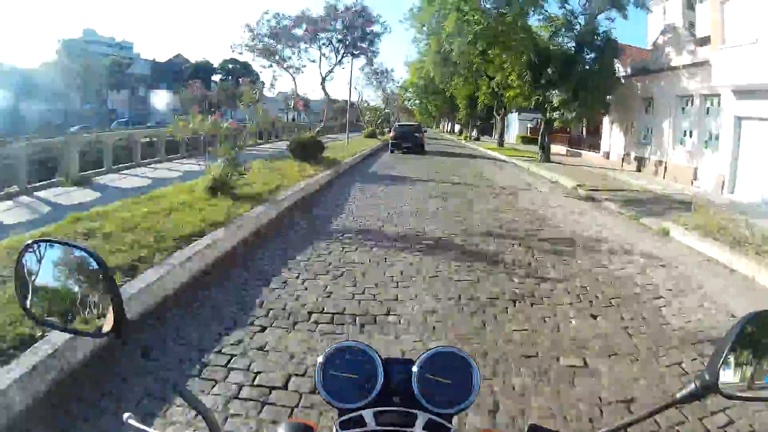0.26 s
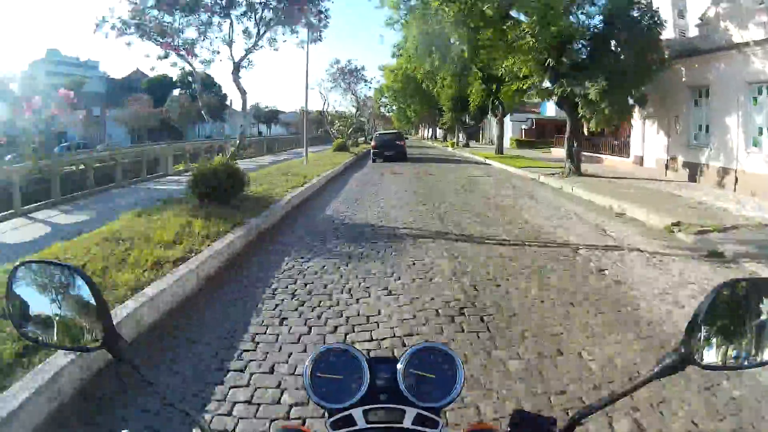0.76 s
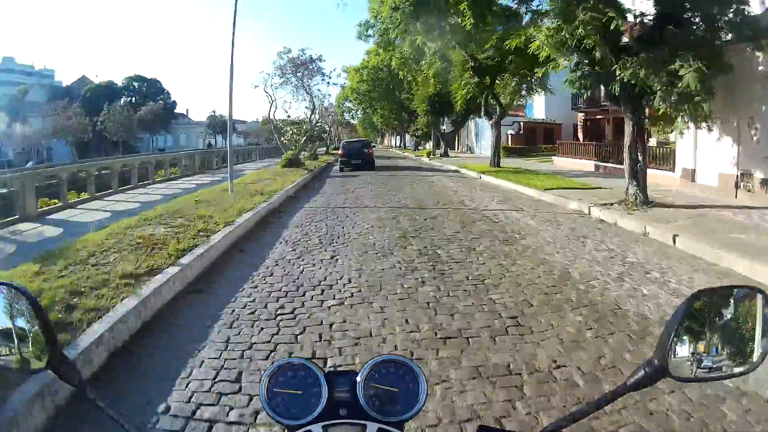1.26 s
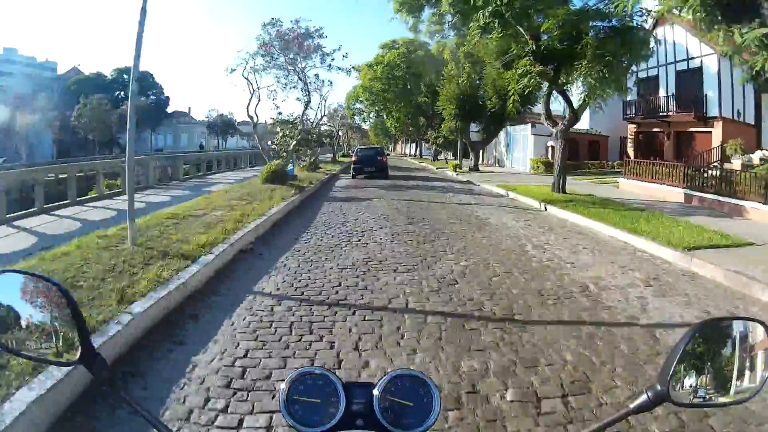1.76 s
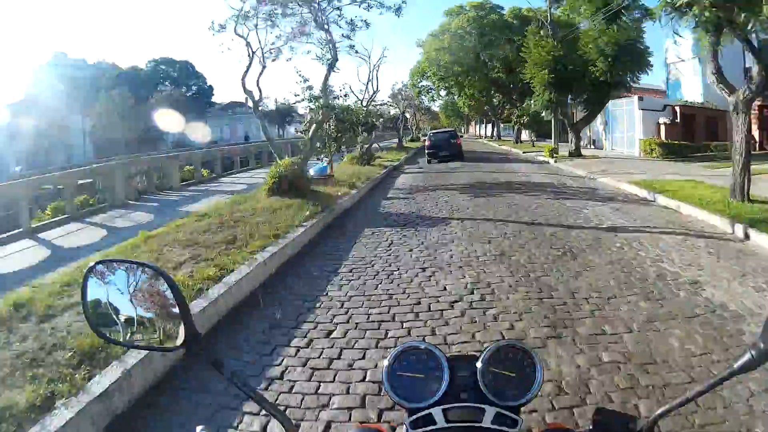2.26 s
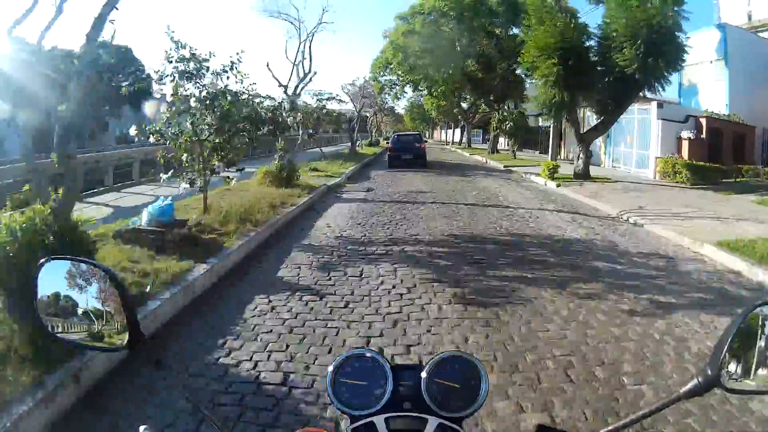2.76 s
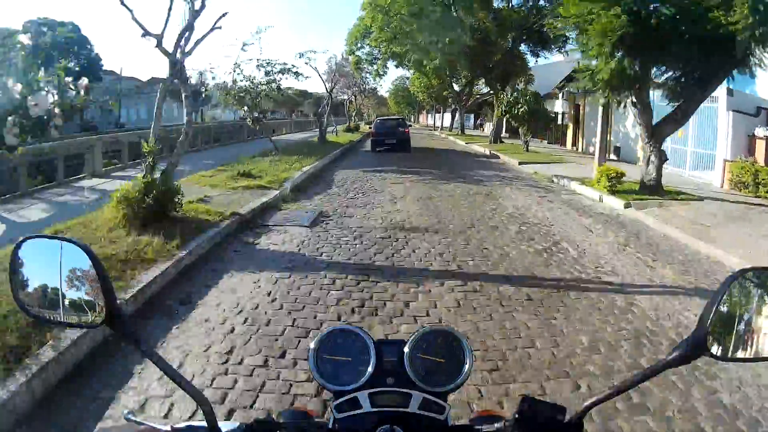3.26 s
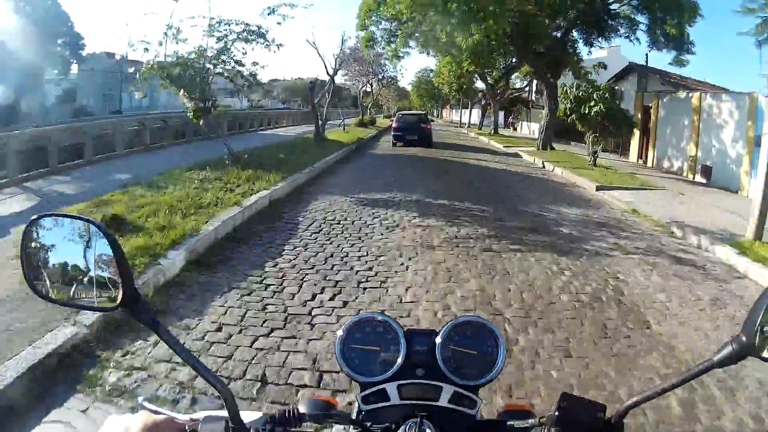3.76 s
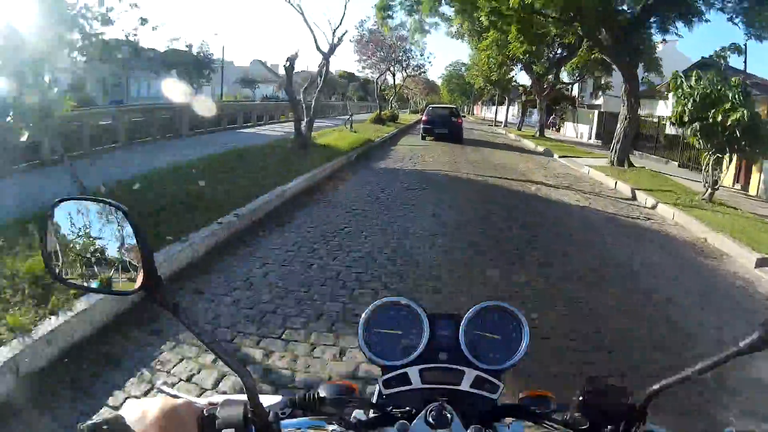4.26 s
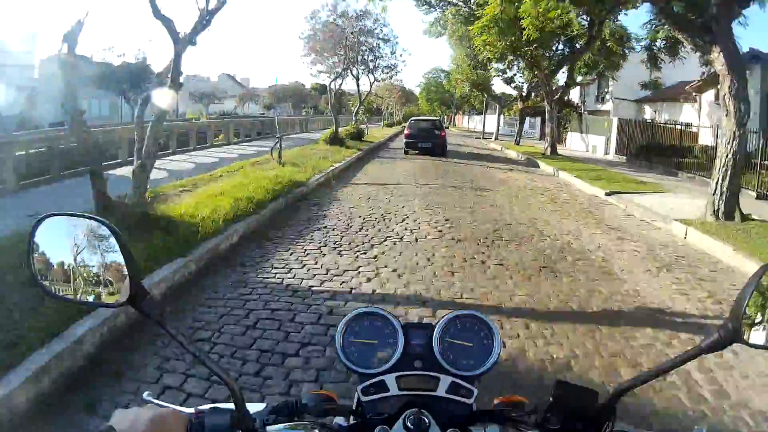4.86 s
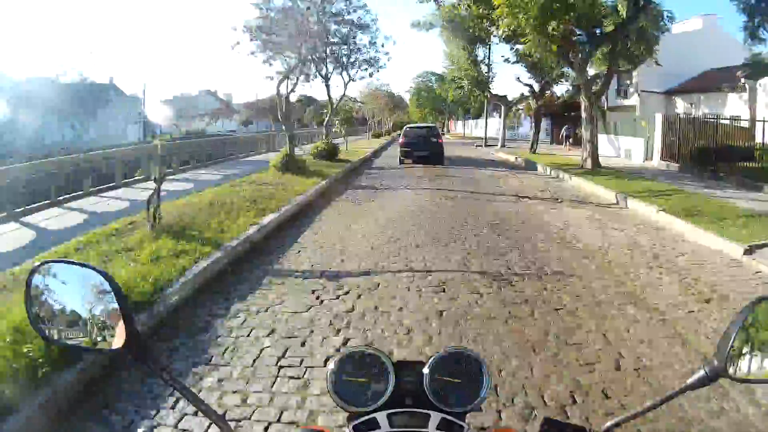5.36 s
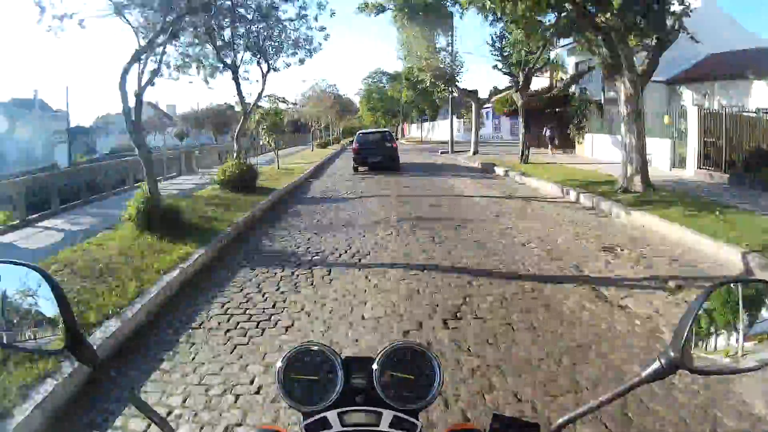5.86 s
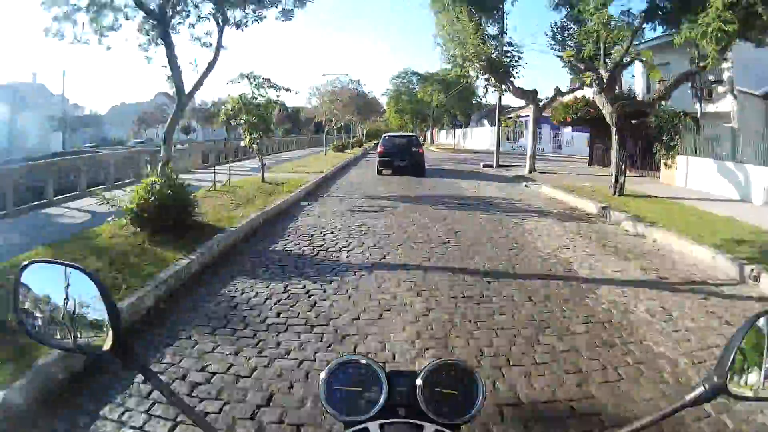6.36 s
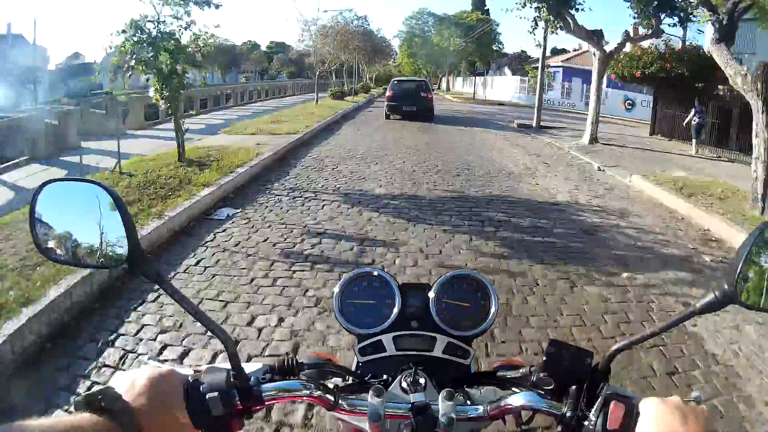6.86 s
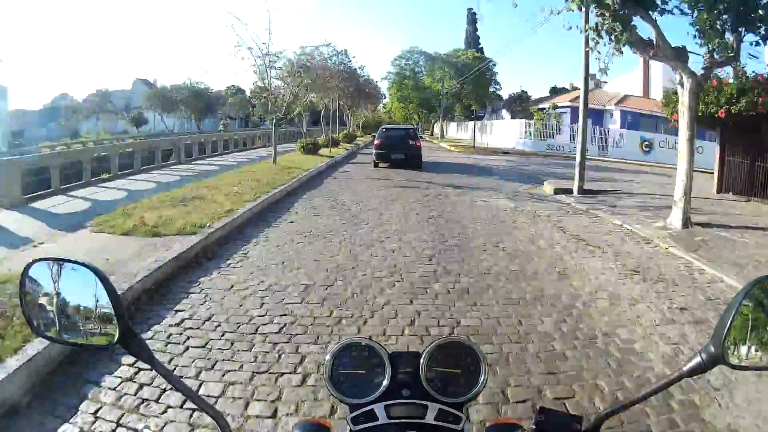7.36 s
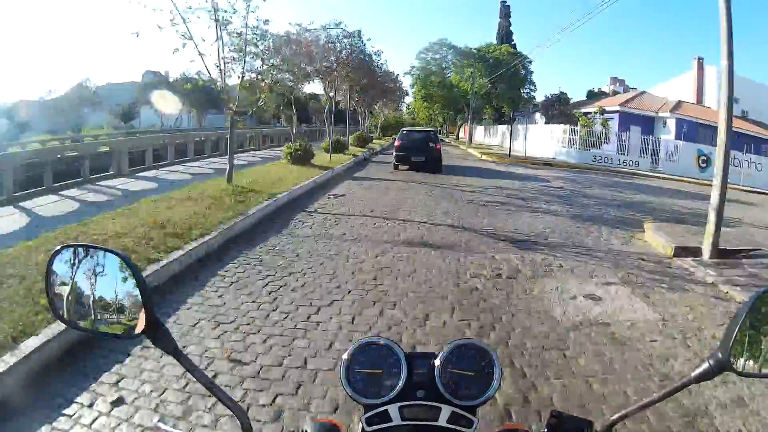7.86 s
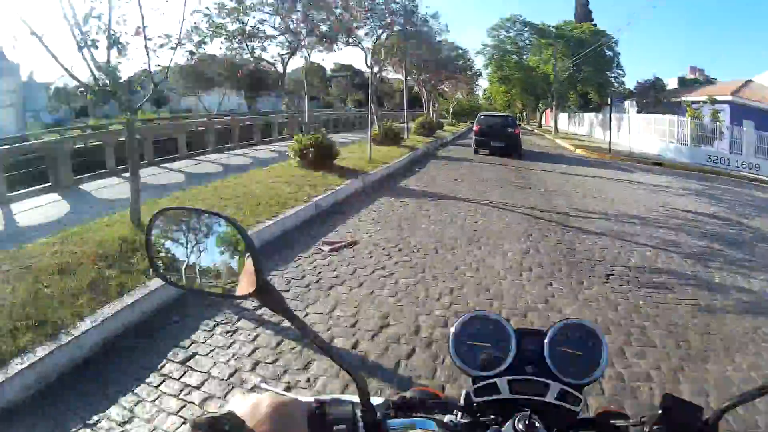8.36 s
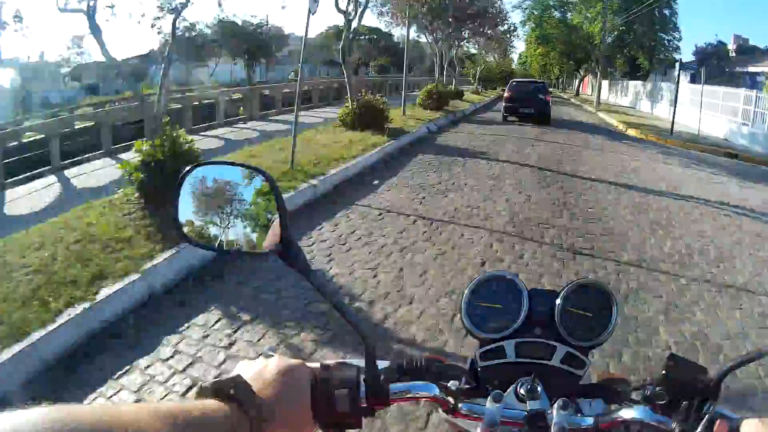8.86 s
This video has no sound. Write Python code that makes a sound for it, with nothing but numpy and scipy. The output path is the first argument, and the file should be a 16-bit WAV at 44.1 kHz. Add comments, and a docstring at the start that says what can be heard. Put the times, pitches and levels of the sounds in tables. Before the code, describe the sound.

From a camera sealed in a plastic case on the rider, a motorcycle moves steadily along a cobbled street. A dull engine hum wavers beneath low, lumpy wheel rumble, while the case rings with a nasal midrange whine. A hard knock comes early, another cluster follows about two and a half seconds in, and smaller knocks come near four seconds. After that the ride is more even, with faint ticks and slight hiss.

```python
"""A motorcycle rolls slowly over cobblestones, heard from a camera shut in a plastic case on the rider.
The engine's muffled hum is a wavering tone at the firing rate, with soft exhaust pulses and a hoarse gear whine.
The wheels rumble as shaped noise and taps, with a low judder. Dense small impacts make the case whine.
Bumps are slow pushes of pressure, rattles are short bursts of taps, and knocks are clicks with a short ring.
The microphone adds a faint hiss."""
import sys
import numpy as np
from scipy import signal
from scipy.fft import rfft, irfft, next_fast_len
from scipy.io import wavfile
from scipy.ndimage import map_coordinates

SR = 44100
rng = np.random.default_rng(int(sys.argv[2]) if len(sys.argv) > 2 else 0)


def wav_out(sig):
    """Save sig, one row per channel (or a flat mono array), as 16-bit PCM at SR to the path in sys.argv[1]."""
    wavfile.write(sys.argv[1], SR, np.round(np.clip(np.atleast_2d(sig).T, -1, 1) * 32767).astype(np.int16))


N = 402176

# how rough the street feels: (t/s, level over the usual/dB); each layer scales this in its own way
ROUGHNESS = [(0, 0.5), (.25, 1), (.62, 2.5), (1.1, 1), (1.75, 1.5), (2.12, 3), (2.36, 0), (2.6, 1.5),
             (3.1, 0), (3.92, -1), (4.22, 3), (4.55, 0), (5.45, 0.65), (6.35, -1), (7.05, -0.1),
             (7.67, 1.2), (8.05, 0.2), (9.12, 0.5)]
# the camera knocks in its case, plus one faint click inside the rattle near 0.75 s: (t/s, click level/dB, ring
# level/dB)
CASE_KNOCKS = [(0.6822, -16, -20), (.749, -48, -34), (2.1272, -32.5, -28), (2.194, -36.5, -29),
               (2.5025, -28, -36), (2.592, -43, -27), (2.6197, -18.5, -18.5), (4.074, -56, -33.5),
               (4.126, -42, -40), (4.1824, -30.5, -35), (4.2064, -22, -23.5), (4.264, -34.5, -31),
               (4.3288, -27, -36), (4.8504, -36, -34), (5.9646, -56, -34.5), (6.531, -40, -45),
               (6.733, -57, -36), (6.7493, -54, -34.5), (6.8771, -47, -34.5)]


def amp(db):
    """Decibels to gain."""
    return 10 ** (np.asarray(db) / 20)


def unit(x):
    """Scale to an average strength (rms) of 1."""
    return x / np.sqrt(np.mean(x ** 2) + 1e-20)


def curves(rows):
    """Draw straight lines between the rows: one value per sample for each column after the time."""
    s, *cols = np.transpose(rows)
    return [np.interp(np.arange(N) / SR, s, c) for c in cols]


def wobble(rate):
    """A smooth random curve, with rate random points a second."""
    points = rng.standard_normal(int(N * rate / SR) + 4)
    return map_coordinates(points, [np.arange(N) * rate / SR])


def filtered(x, response):
    """Change the strength and phase of each frequency in x by the given response."""
    m = next_fast_len(N + SR // 2)  # spare room lets the ringing die out
    spectrum = rfft(x, m) * response(np.fft.rfftfreq(m, 1 / SR))
    return irfft(spectrum, m)[:N]


def gains(points, hz):
    """Gain at each frequency, read between (f/Hz, level/dB) points on a log axis."""
    f, db = np.transpose(points)
    return amp(np.interp(np.log(hz + 1), np.log(f + 1), db))


def coloured(x, points):
    """Filter x by the given tone curve, then scale to rms 1."""
    return unit(filtered(x, lambda hz: gains(points, hz)))


def impulse(points, size=4096):
    """A pulse with the given spectrum that starts at once (minimum phase), scaled to peak 1."""
    cepstrum = irfft(np.log(gains(points, np.fft.rfftfreq(size, 1 / SR))))
    # folding the second half onto the first puts the energy as early as possible
    cepstrum[1:size // 2] *= 2
    cepstrum[size // 2 + 1:] = 0
    pulse = irfft(np.exp(rfft(cepstrum)))
    return pulse / np.abs(pulse).max()


def resonance(hz, centre, width):
    """Response of one damped mode: strongest at its centre, and ringing longer when it is narrow."""
    return 1j * hz * width / (centre ** 2 - hz ** 2 + 1j * hz * width)


def taps(rate, scatter_db):
    """Random tiny impacts of uneven size, about rate of them a second, at rms 1."""
    hits = rng.random(N) < rate / SR
    sizes = rng.standard_normal(N)
    return unit(hits * sizes * amp(scatter_db * rng.standard_normal(N)))


def swells(rows):
    """A gain that rises and falls in a bell around each (t/s, peak level/dB, half-width/s)."""
    gain, t = np.zeros(N), np.arange(N) / SR
    for s, db, length in rows:
        near = slice(*np.searchsorted(t, [s - 10 * length, s + 10 * length]))
        gain[near] += amp(db) * np.exp(-((t[near] - s) / length) ** 2 / 2)
    return gain


def engine(gear_order=12.2, gear_blur=130):
    """Uneven firings through the exhaust, a hum at the firing rate and a hoarse gear whine locked to it."""
    # engine speed: (t/s, firing rate/Hz), wavering slightly below
    speed_curve = [(0, 93.5), (2, 97.6), (3.3, 93.1), (4.3, 89.3), (5.5, 93.1), (6, 88.3), (7.2, 86.3),
                   (9.12, 90)]
    # the hum rises and falls with the throttle: (t/s, level/dB)
    throttle_curve = [(0, -56), (1.3, -61.5), (3.3, -52.5), (4.3, -62), (4.9, -74), (5.5, -58.5),
                      (6.45, -52), (6.8, -68), (8.2, -57.5), (9.12, -52)]
    # tone of the exhaust: (f/Hz, relative level/dB)
    exhaust_tone = [(40, -25), (90, 9.5), (160, -20), (245, -7.5), (320, -11.5), (450, -9.5), (700, -19.5),
                    (1500, -33), (4000, -80)]
    exhaust_db, gear_db = -60.5, -65.5
    (firing_hz,), (hum_db,) = curves(speed_curve), curves(throttle_curve)
    turns = np.cumsum(firing_hz * (1 + .01 * wobble(25))) / SR  # counts firings
    firings = np.diff(np.floor(turns), prepend=0) * amp(3.1 * rng.standard_normal(N))
    hum = unit(np.sin(2 * np.pi * turns) * amp(3.3 * wobble(14)))
    mesh = 2 * np.pi * gear_order * turns
    # backlash smears the tone
    gears = unit(np.sin(mesh) * wobble(gear_blur) + np.cos(mesh) * wobble(gear_blur))
    exhaust = amp(exhaust_db) * coloured(firings, exhaust_tone)
    return amp(hum_db) * hum + exhaust + amp(gear_db) * gears


def wheels(boom_hz=243, boom_width_hz=14, sway_lumps_db=3.5, drum_lumps_db=0.9):
    """The bike sways and judders while the stones drum on the tyres, with a hollow boom beneath."""
    # tone of the sway: (f/Hz, relative level/dB per Hz)
    sway_tone = [(3, -15.5), (13, -3), (22, 0), (33, -5), (48, -22), (75, -13), (115, -15.5), (150, -26.5),
                 (300, -59), (1000, -90)]
    # tone of the drumming: (f/Hz, relative level/dB per Hz)
    drum_tone = [(70, -8.5), (150, -6.5), (195, -0.5), (250, -1.5), (315, -0.5), (345, -6), (430, -6),
                 (550, -11.5), (660, -10.5), (800, -18), (1200, -14.5), (3000, -43)]
    # how hard the stones drum on the tyres: (t/s, level over the usual/dB), scaled for each layer
    drumming_curve = [(0, -2), (.7, 0), (1.15, -1.5), (2, 2.5), (2.55, 3), (3.2, 0), (3.7, 2.5), (4.8, -2),
                      (5.3, 0), (6.1, -1.5), (7.6, 0), (8.1, -.5), (8.6, 2), (8.88, .5), (9.12, 2.5)]
    # patches of stones that set the bike juddering: (t/s, peak level/dB)
    judder_patches = [(.7, -45), (1.65, -48), (2.22, -40.5), (2.68, -45), (3.79, -41.5), (4.55, -44),
                      (5.25, -49), (6.97, -47), (7.42, -45.5), (8.22, -42.5)]
    # usual levels in dB, and dB gained per dB of roughness (sway) or drumming (drum, boom)
    sway_level_db, sway_grows = -45.5, 1.45
    drum_level_db, drum_grows = -52.5, 0.98
    boom_level_db, boom_grows = -58, 2.07
    judder_db, patch_s = -52, 0.071  # judder between the patches; half-width of a patch
    thud_db, thud_s = -33.5, 0.018  # tyre's thud around each knock, against its click; its half-width

    (road_db,), (drumming_db,) = curves(ROUGHNESS), curves(drumming_curve)
    sway = coloured(rng.standard_normal(N), sway_tone)
    sway = sway * amp(sway_grows * road_db + sway_lumps_db * wobble(12))

    drum = coloured(taps(rate=1200, scatter_db=1.0) + 0.84 * rng.standard_normal(N), drum_tone)
    thuds = swells([(s, click_db + thud_db, thud_s) for s, click_db, _ in CASE_KNOCKS])
    drum_gain = amp(drum_level_db + drum_grows * drumming_db + drum_lumps_db * wobble(16))
    drum = drum * (drum_gain + thuds)

    def hollow(hz):
        narrow = resonance(hz, boom_hz, boom_width_hz)
        return narrow * resonance(hz, boom_hz, 4 * boom_width_hz)

    boom = unit(filtered(rng.standard_normal(N), hollow))
    boom = amp(boom_level_db + boom_grows * drumming_db) * boom

    stone_hz = 50 + 8.5 * wobble(22)  # the rows of stones are unevenly spaced
    judder = unit(np.sin(2 * np.pi * np.cumsum(stone_hz) / SR) * amp(3.2 * wobble(20)))
    patches = swells([(s, db, patch_s) for s, db in judder_patches])
    judder = judder * np.hypot(amp(judder_db), patches)
    return amp(sway_level_db) * sway + drum + boom + judder


def case(drive, modes):
    """The given case modes ringing, at rms 1; a second, wider resonance steepens each one's skirts."""
    def response(hz):
        return sum(amp(db) * resonance(hz, c, w) * resonance(hz, c, 5 * w) for c, w, db in modes)

    return unit(filtered(drive, response))


def whine(split_hz=2500):
    """Dense small impacts keep the case ringing; its low and high modes both grow with the roughness."""
    # modes of the plastic case: (f/Hz, width of the narrower resonance/Hz, relative level/dB)
    case_modes = [(950, 104, -11), (1053, 72, -9), (1356, 125, -1), (1386, 39.7, 1), (1662, 124, -13.5),
                  (2004, 48, -10.5), (2852, 115, -21), (2990, 60, -35), (4096, 165, -26)]
    # usual levels in dB, and dB gained per dB of roughness
    shake_db, shake_grows = -51.5, 0.88
    chatter_db, chatter_grows = -74, 2
    road_db, = curves(ROUGHNESS)
    impacts = taps(rate=1100, scatter_db=0.0) + 0.79 * rng.standard_normal(N)
    shaking = unit(impacts * amp(1.2 * wobble(30)))
    low = case(shaking, [mode for mode in case_modes if mode[0] < split_hz])
    high = case(shaking, [mode for mode in case_modes if mode[0] >= split_hz])  # fine chatter
    return amp(shake_db + shake_grows * road_db) * low + amp(chatter_db + chatter_grows * road_db) * high


def bumps():
    """Each bump heaves the camera: one slow push of pressure, with a dip on either side."""
    # (t/s, peak level/dB, time from the peak to where the pressure crosses zero/s)
    bump_rows = [(0.362, -31, 0.0083), (0.57, -29, 0.011), (0.68, -27, 0.013), (0.743, -29, .01),
                 (1.144, -34, 0.0099), (1.981, -29, 0.0076), (2.052, -28, 0.018), (2.608, -35, .013),
                 (3.116, -32, 0.011), (3.535, -32.5, 0.015), (4.119, -35, 0.01), (4.184, -29, 0.013),
                 (4.32, -33, 0.017), (5.958, -32, 0.0076), (7.177, -29.5, 0.0078)]
    out = np.zeros(N)
    for s, db, length in bump_rows:
        u = (np.arange(N) / SR - s) / length
        out += amp(db) * (1 - u ** 2) * np.exp(-u ** 2 / 2)
    return out


def rattles(blur=0.64):
    """Each raised stone shakes loose a brief cluster of taps, blurred by noise."""
    # jolts from raised stones: (t/s, peak level/dB, half-width/s)
    jolt_rows = [(0.477, -47, 0.04), (.707, -40.5, .005), (.755, -43, 0.021), (2.07, -51.5, 0.045),
                 (2.59, -45, 0.029), (2.897, -45, 0.0077), (3.224, -48, 0.019), (4.263, -44.5, 0.015),
                 (5.983, -50, 0.015), (6.57, -51.5, 0.036), (6.76, -44.5, .016), (6.904, -46, .015),
                 (7.189, -45.5, .018), (8.505, -52, 0.0098)]
    # tone of the rattling: (f/Hz, relative level/dB per Hz)
    rattle_tone = [(40, -40), (200, -13), (450, 0), (750, -8), (1080, -0.5), (1250, 1.5), (1440, 12),
                   (1580, -18), (1760, -2.5), (2100, -13), (2500, -17), (4200, -27), (5500, -34),
                   (9000, -63)]
    clatter = taps(rate=1000, scatter_db=1.5)
    return swells(jolt_rows) * coloured(clatter + blur * rng.standard_normal(N), rattle_tone)


def ticks(per_s=1.4, middle_db=-54.5, scatter_db=3, ring_over_click_db=6):
    """Faint knocks at random moments, as rows like those of CASE_KNOCKS."""
    draws = rng.random((round(per_s * N / SR), 2))
    times = draws[:, 0] * N / SR
    levels = middle_db + scatter_db * (2 * draws[:, 1] - 1)
    return [(s, db, db + ring_over_click_db) for s, db in zip(times, levels)]


def knocks(ring_hz=1400, ring_t60=0.05, rise=0.00098, scrape_t60=0.016, pitch=0.996):
    """A dull click with a hard edge, a quick rebound and a short scrape; the case's main mode rings on."""
    # body of a knock: (f/Hz, relative level/dB); pitch lowers it slightly below
    click_tone = [(20, -60), (120, -45), (300, -20), (700, -15.5), (1100, -17.5), (1550, -2), (1780, 3.5),
                  (2040, 10.5), (2280, -10.5), (2700, -14.5), (4000, -87), (6000, -95)]
    # its hard contact: (f/Hz, relative level/dB); pitch lowers it in the contact, not in the scrape
    edge_tone = [(1500, -32.5), (2800, -14), (3300, 1), (3520, -6), (3660, 6.5), (3820, -3), (4050, -4.5),
                 (4600, -6), (5150, -17.5), (6000, -29), (9000, -64), (14000, -87)]
    edge_start_db, edge_grows = -9.5, 1.286  # edge of a 0 dB click; it grows faster than the click
    rebound_delay, rebound_db = 0.001774 / pitch, -9  # s; dB against the contact
    scrape_db = -10  # against the edge
    click, edge = impulse(click_tone), impulse(edge_tone)
    t = np.arange(len(click)) / SR
    onset = 1 - np.exp(-t / rise)
    # t60: seconds to fade by 60 dB
    ring = np.sin(2 * np.pi * ring_hz * t) * amp(-60 * t / ring_t60) * onset
    out = np.zeros(N + SR)
    for s, click_db, ring_db in list(CASE_KNOCKS) + ticks():
        edge_db = edge_start_db + edge_grows * click_db
        contact = amp(click_db) * click + amp(edge_db) * edge
        contact = map_coordinates(contact, [t * SR * pitch])  # played slightly slower
        rebound = np.interp(t - rebound_delay, t, contact, left=0)
        scrape = unit(signal.fftconvolve(rng.standard_normal(len(t)), edge, "same"))
        scrape = scrape * amp(-60 * t / scrape_t60) * onset
        knock = contact + amp(rebound_db) * rebound
        knock = knock + amp(ring_db) * ring + amp(edge_db + scrape_db) * scrape
        out[round(s * SR):][:len(t)] += knock
    return out[:N]


def scene():
    """Add up the engine, the wheels and the whining, rattling, knocking case."""
    return (engine() + wheels() + whine() + rattles() + bumps() + knocks())[None]


def record(dry, hiss_db=-69.5, top_hz=15780):
    """The microphone adds its hiss; nothing is kept from top_hz upwards."""
    # tone of the hiss: (f/Hz, relative level/dB per Hz)
    hiss_tone = [(100, 8), (3000, -1), (5500, -3.5), (8000, -3.5), (14000, -4.5), (15200, -5), (15800, -51)]
    hiss = amp(hiss_db) * coloured(rng.standard_normal(N), hiss_tone)
    return filtered(dry[0] + hiss, lambda hz: hz < top_hz)[None]


dry = scene()
out = record(dry)
wav_out(out)
```